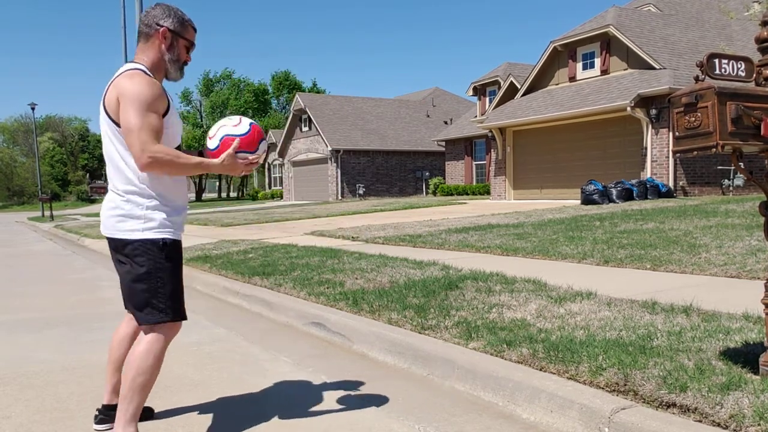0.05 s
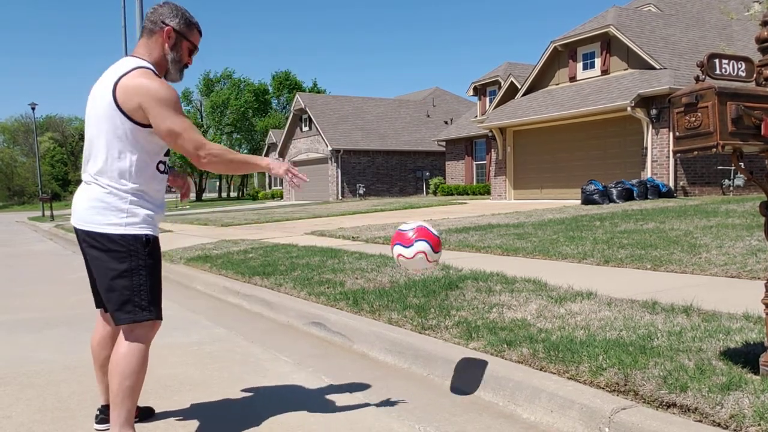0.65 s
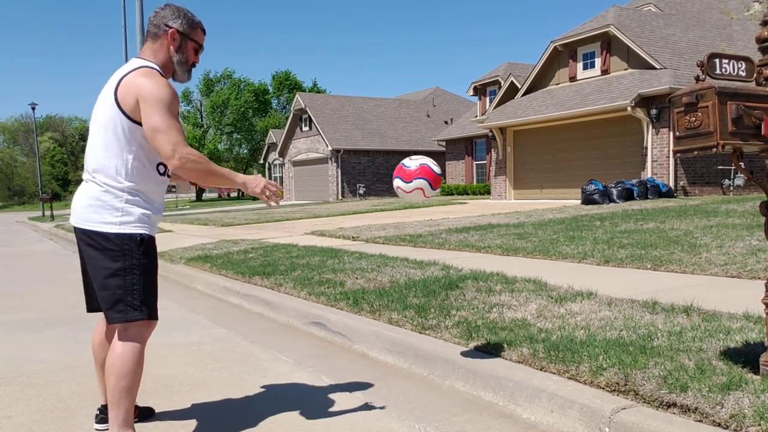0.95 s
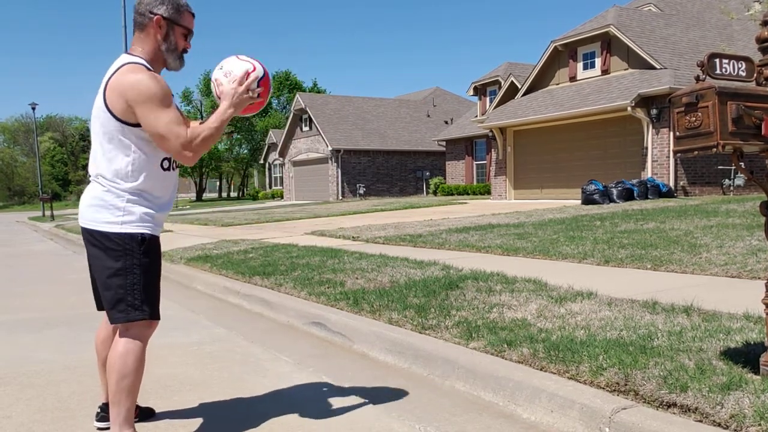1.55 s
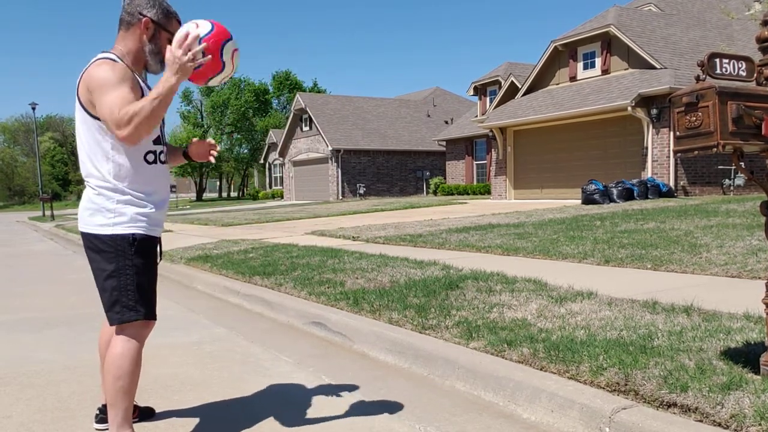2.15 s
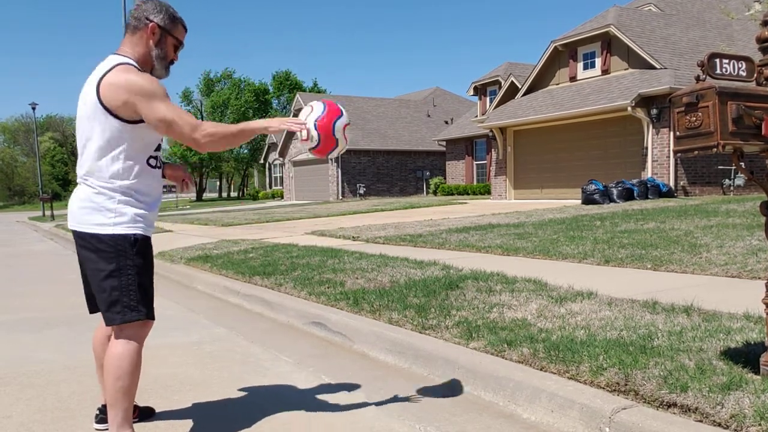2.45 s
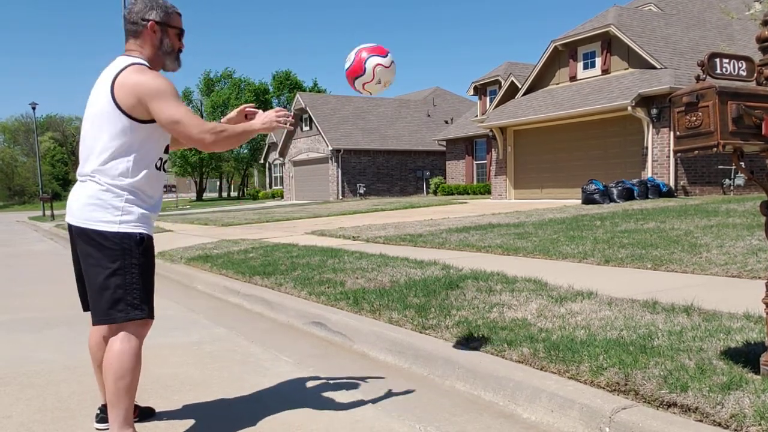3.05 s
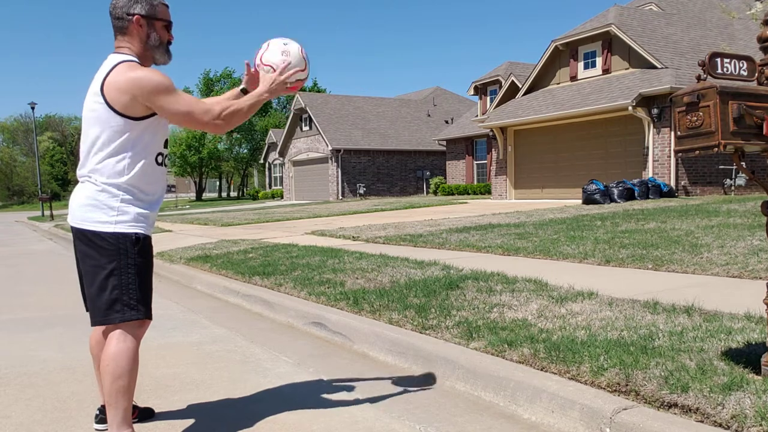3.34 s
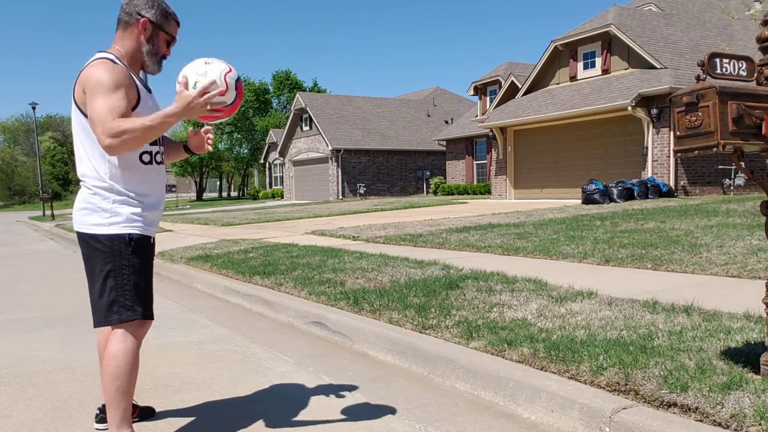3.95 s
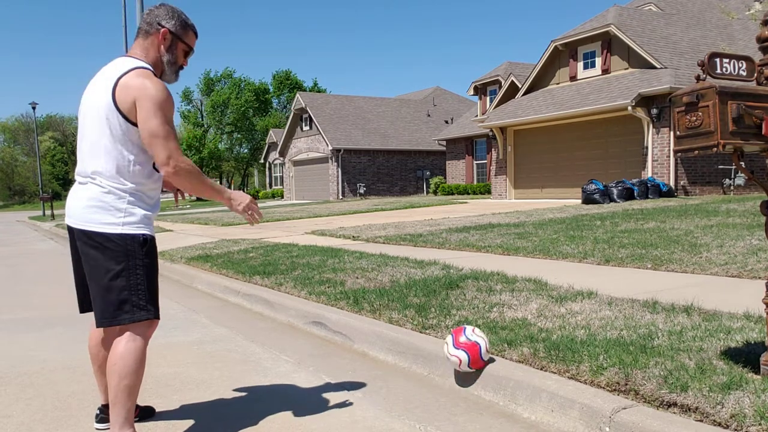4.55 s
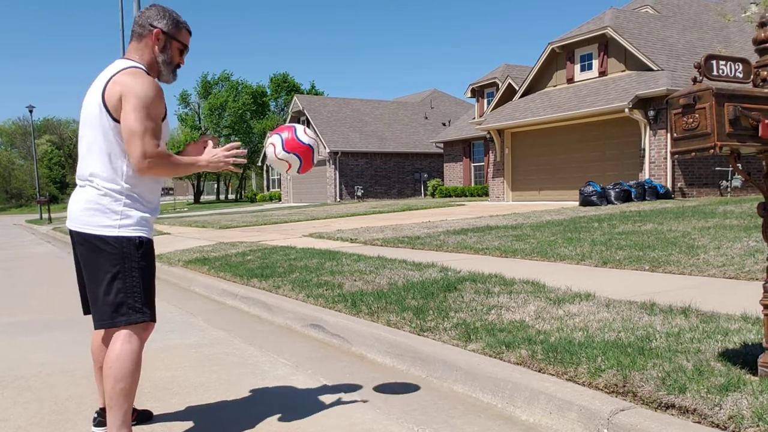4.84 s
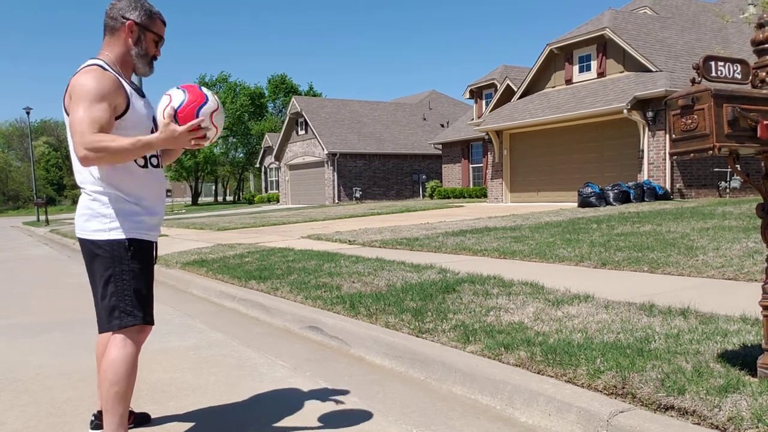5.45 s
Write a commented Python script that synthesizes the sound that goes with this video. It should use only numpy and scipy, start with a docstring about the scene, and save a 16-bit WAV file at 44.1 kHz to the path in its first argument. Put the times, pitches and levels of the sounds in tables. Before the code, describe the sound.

A football hits a concrete curb three times, about two seconds apart. Each bounce is a gritty smack with a deep thump and a hollow pop, followed about half a second later by the much softer slap of hands catching it. The ball is close to the microphone, with a faint echo from nearby houses. Small birds chirp in the distance over a low rumble of far traffic.

```python
"""Football against a curb

A football is thrown three times against a concrete curb on a quiet street and caught again.
Each bounce is a gritty smack, a deep thump as the ball flattens and springs back, and a pop as it leaves.
Hands slap and slide on its cover; birds sing in the trees, and far traffic rumbles behind the houses."""
import sys
import numpy as np
from scipy import signal
from scipy.fft import rfft, irfft
from scipy.io import wavfile

SR = 44100
rng = np.random.default_rng(int(sys.argv[2]) if len(sys.argv) > 2 else 0)


def wrap_up_sound(samples):
    """Save the sound to the file named by the first command line argument, as 16-bit audio."""
    columns = np.atleast_2d(samples).T
    # keep every value between -1 and 1, then stretch to whole-number steps
    tamed = np.clip(columns, -1, 1)
    steps = np.round(tamed * 32767).astype(np.int16)
    wavfile.write(sys.argv[1], SR, steps)


N = 251811
TIME = np.arange(N) / SR
BIN_HZ = np.arange(N // 2 + 1) * SR / N
SIDES = np.array([[1], [-1]])   # left, right


# Curb hits: (time [s], contact [s], thump [dB], landing knock [dB], crack [dB], crack pitch [Hz],
# grit smack [dB], scuff [dB], leaving pop [dB])
BOUNCES = [(0.8083, 0.016, -16.5, -25.5, -22.5, 4040, -21.5, -31, -16),
           (2.7190, 0.016, -16, -32.5, -29, 6050, -21.5, -39, -18),
           (4.6069, .0168, -15, -18, -16, 5390, -20, -33, -18.5)]
# Colour of grit crushed on concrete: (frequency [Hz], level [dB])
GRIT_COLOUR = [(300, 5.5), (1300, -0.5), (2300, -16.5), (3300, -10.5), (4400, -3), (5600, -2), (6800, -9.5),
               (8300, -24.5), (11000, -24.5), (15500, -17.5)]

def bounces(smack_t60=0.015, crack_t60=0.0067, crush_db=-23, crush_t60=0.037,
            scuff_s=0.0043, scuff_lead_s=0.0032, snap_db=-22, snap_t60=0.023):
    """The ball cracks down on grit, scuffs as it peels off, then pops back into shape."""
    lead_s, yield_s = .004, .0008   # pre-roll; time until the shell gives
    out, t = np.zeros(N), np.arange(SR // 4) / SR - lead_s
    for s, contact_s, thump_db, land_db, crack_db, crack_hz, smack_db, scuff_db, pop_db in BOUNCES:
        leaving = t - contact_s
        crack = from_db(crack_db) * ring(t, crack_hz, crack_t60)   # the taut cover slaps the concrete
        crush = from_db(crush_db) * fade(t, crush_t60)
        smack = from_db(smack_db) * (fade(-t, 0.0036) + fade(t, smack_t60) + crush)
        scuff = from_db(scuff_db) * np.exp(-((leaving + scuff_lead_s) / scuff_s) ** 2)
        grit = (smack + scuff) * noise(GRIT_COLOUR, len(t))
        snap = from_db(pop_db + snap_db) * fade(leaving, snap_t60) * noise(SLAP_COLOUR, len(t))
        shell = from_db(pop_db) * knock(leaving) - from_db(land_db) * knock(t + yield_s)
        low_end = from_db(thump_db) * thump(t - yield_s, contact_s)
        add(out, s - lead_s, low_end + crack + grit + snap + shell)
    return out


def thump(t, contact_s, skew=1.064, shell_db=-7, soft_hz=520, low_cut_hz=58, low_cut_q=1.47):
    """The ball flattens and springs back, radiating its volume's acceleration, and its shell wobbles."""
    dent = np.sin(np.pi * np.clip(t / contact_s, 0, 1) ** skew) ** 2
    acceleration = np.gradient(np.gradient(dent)) * (SR * contact_s / np.pi) ** 2 / 2
    wobble = ring(t + 0.0012, hz=130, t60=0.059)
    shell = from_db(shell_db) * ring(t - .0008, hz=204, t60=0.055)
    pressure = low_pass(acceleration, soft_hz) - wobble + shell
    w = 2 * np.pi * low_cut_hz   # the slowest part of the push is lost, leaving an overswing
    return signal.lfilter(*signal.bilinear([1, 0, 0], [1, w / low_cut_q, w * w], SR), pressure)


# The ball's ringing modes: (frequency [Hz], level [dB], decay t60 [s])
BALL_MODES = [(358, -26.5, 0.074), (503, -25.5, 0.0068), (876, -1.5, 0.0048), (1015, -10, 0.021),
              (1282, -14, 0.029), (1554, -20, 0.019), (1870, -32, 0.068)]

def knock(t, spread_db=2.5):
    """All modes of the ball ring, each a little stronger or weaker from blow to blow."""
    return sum(from_db(db + spread_db * rng.standard_normal()) * ring(t, hz, t60)
               for hz, db, t60 in BALL_MODES)


# Hands catching the ball: (time [s], palm delay [s], finger slap [dB], finger knock [dB],
# palm slap [dB], palm air pocket [dB], pocket pitch [Hz])
CATCHES = [(1.4399, .0102, -51, -47, -41.5, -36, 359), (3.4286, .0075, -48, -42, -47, -43, 434),
           (5.013, .0150, -46, -46, -39, -43.5, 424)]

def catches(fingers=3, uneven=0.15, spread_db=1.5, fingertip_hz=466, pitch_spread=0.081, lead_s=0.0054):
    """The fingers land one after another, then the cupped palm closes on the ball."""
    out, t = np.zeros(N), np.arange(SR // 8) / SR - lead_s
    for s, grip_s, finger_db, knock_db, palm_db, pocket_db, pocket_hz in CATCHES:
        for k, (late, force, size) in enumerate(rng.standard_normal((fingers, 3))):
            finger = touch(t, finger_db, knock_db, fingertip_hz * np.exp(pitch_spread * size))
            delay_s = grip_s * k / fingers * (1 + uneven * late)
            add(out, s - lead_s + delay_s, from_db(spread_db * force) * finger)
        palm = touch(t, palm_db, pocket_db, pocket_hz, seal_s=0.00394)
        add(out, s - lead_s + grip_s, palm)
    return out


# Colour of a slap or snap on the cover: (frequency [Hz], level [dB])
SLAP_COLOUR = [(300, -4), (1300, -7), (2300, 2), (4500, 7.5), (6000, -1), (7500, -23.5), (10000, -20),
               (15500, -20)]

def touch(t, slap_db, knock_db, pocket_hz, seal_s=0, slap_t60=0.017, press_s=0.0016,
          hollow_db=-5, shell_db=-3):
    """A finger or palm slaps the cover, seals a ringing pocket of air and knocks the shell."""
    slap = from_db(slap_db) * (fade(-t, press_s) + fade(t, slap_t60)) * noise(SLAP_COLOUR, len(t))
    sealed = t - seal_s
    pocket = ring(sealed, pocket_hz, t60=0.065)
    hollow_overtone = from_db(hollow_db) * ring(sealed, 2.32 * pocket_hz, t60=0.034)
    shell = from_db(shell_db) * knock(sealed)
    return slap + from_db(knock_db) * (pocket + hollow_overtone + shell)


WIPE_AT_S, WIPE_LENGTH_S = .030, .038   # a hand slides over the cover before the first throw

def wipe_taps(pocket_hz=2050, ease_s=0.011, lead_s=0.0057):
    """The sliding hand taps the cover as it lands, as it presses hardest and as it flicks off."""
    out, t = np.zeros(N), np.arange(SR // 8) / SR - lead_s
    land, press, flick = (0, -51, -47), (WIPE_LENGTH_S, -46, -53), (WIPE_LENGTH_S + ease_s, -47, -62)
    for after_s, slap_db, knock_db in (land, press, flick):
        add(out, WIPE_AT_S + after_s - lead_s, touch(t, slap_db, knock_db, pocket_hz))
    return out


# Colour of skin rubbing the cover: (frequency [Hz], level [dB])
RUB_COLOUR = [(300, 3.5), (600, 1), (1500, 4), (3200, -16), (5500, 4), (7500, -6), (10000, -13.5),
              (15500, 1)]

def rubs(wipe_db=-48, grip_db=-58, grain_db=3, grain_hz=360):
    """Skin sticks and slips on the cover in fine uneven grains, in the wipe and in every catch."""
    pressure = from_db(wipe_db) * stroke(WIPE_AT_S, WIPE_LENGTH_S, swell_db=7, release_t60=0.043)
    for s, grip_s, *_ in CATCHES:
        pressure += from_db(grip_db) * stroke(s, grip_s, swell_db=2, release_t60=.13)
    grain = rms_one(low_pass(rng.standard_normal(N), grain_hz))
    return pressure * from_db(grain_db * grain) * np.array([noise(RUB_COLOUR), noise(RUB_COLOUR)])


def stroke(s, length_s, swell_db, release_t60, attack_s=0.0066):
    """Pressure of a sliding hand: it comes on quickly, grows ever faster, then lets go."""
    t = TIME - s
    attack = fade(np.maximum(-t, 0), attack_s)
    swell = from_db(swell_db * np.clip(t / length_s, 0, 1) ** 2)
    release = fade(np.maximum(t - length_s, 0), release_t60)
    return attack * swell * release


# Cues for one bird's call: (time [s], relative level [dB])
SCOOP_CALLS = [(1.000, -63), (1.362, -58.5)]
# Its two syllables: (delay [s], length [s], first pitch [Hz], middle pitch [Hz], last pitch [Hz])
SCOOP_SYLLABLES = [(0, .075, 3310, 2990, 3000), (0.092, 0.088, 3065, 3230, 3940)]

def scooping_bird(buzz_depth_hz=190):
    """A nearer bird repeats a buzzy call that dips and scoops upward."""
    out = np.zeros(N)
    for s, db in SCOOP_CALLS:
        for delay_s, length_s, *pitches in SCOOP_SYLLABLES:
            add(out, s + delay_s, from_db(db) * chirp(length_s, pitches, buzz_depth_hz))
    return out


# Slurred whistles: (time [s], length [s], first pitch [Hz], last pitch [Hz], relative level [dB])
BIRD_NOTES = [(0.096, 0.037, 3620, 3310, -62), (0.452, .06, 4490, 4480, -73.5),
              (2.223, 0.044, 2540, 2710, -63), (2.325, 0.037, 3040, 2675, -62.5),
              (2.47, 0.13, 4180, 3340, -67), (2.734, 0.031, 2610, 2540, -61),
              (2.839, 0.065, 3074, 1985, -69), (3.037, .12, 3510, 3310, -63),
              (3.156, 0.068, 2940, 2375, -73.5), (3.621, 0.032, 2756, 2870, -67),
              (3.649, 0.03, 2976, 2545, -64.5), (3.777, 0.1, 4320, 3740, -75.5),
              (3.975, .05, 5200, 4400, -74), (4.104, 0.032, 3290, 3255, -64), (4.2, 0.13, 3640, 3470, -72),
              (4.207, .11, 2760, 1926, -67), (4.364, .09, 3078, 2926, -67), (4.464, .03, 2944, 2190, -70),
              (4.549, 0.061, 5270, 4200, -69), (4.624, 0.066, 2353, 1945, -60.5),
              (5.158, 0.15, 2902, 2850, -69), (5.164, 0.058, 4080, 3610, -68.5)]

def slurring_birds(sag=.012, warble=0.025):
    """Nearer birds slur single notes that warble and sag a little in the middle."""
    out = np.zeros(N)
    for s, length_s, first_hz, last_hz, db in BIRD_NOTES:
        middle_hz = np.sqrt(first_hz * last_hz) * (1 - sag)
        add(out, s, from_db(db) * chirp(length_s, [first_hz, middle_hz, last_hz], warble * middle_hz))
    return out


# Fader ride on the distant birds: (time [s], relative note level [dB])
CHORUS_LEVEL = [(0, -94.5), (3.3, -87), (4.2, -86), (4.8, -70.5), (5.3, -81.5), (5.7, -68)]

def chorus(low_hz=2400, high_hz=5100, glide=0.15, rasp_hz=110, shortest_s=0.0158, spread_s=.04,
           count=300):
    """Distant birds chatter at random in quick, mostly falling notes."""
    out = np.zeros(N)
    for when, length, height, slope, rasp in rng.random((count, 5)):
        s = when * N / SR
        middle_hz = low_hz * (high_hz / low_hz) ** height
        fall = glide * (1.2 * slope - .5)
        pitches = middle_hz * np.array([1 + fall, 1, 1 - fall])
        note = chirp(shortest_s + spread_s * length, pitches, rasp * rasp_hz)
        add(out, s, from_db(curve(CHORUS_LEVEL, s)) * note)
    return out


def far_whistler(pitch_hz=2620, spread=0.15, length_s=0.1106, droop=0.02, count=10):
    """One far bird pipes nearly level notes at loose intervals."""
    out = np.zeros(N)
    for k, (late, height) in enumerate(rng.random((count, 2))):
        middle_hz = pitch_hz * (1 + spread * (2 * height - 1))
        pitches = middle_hz * np.array([1 + droop, 1, 1 - droop])
        add(out, (k + late) * N / SR / count, chirp(length_s, pitches, buzz_depth_hz=0))
    return out


def chirp(length_s, pitches, buzz_depth_hz, buzz_hz=150, waver=0.0067, flutter_db=3):
    """A whistle glides through three pitches, with a fast warble that makes it buzz."""
    progress = np.linspace(0, 1, int(length_s * SR))
    jitter = rms_one(low_pass(rng.standard_normal((2, SR // 4)), hz=79))
    tremble, flutter = jitter[:, -len(progress):]
    glide_hz = np.polyval(np.polyfit([0, .5, 1], pitches, 2), progress)
    buzz = np.sin(2 * np.pi * buzz_hz * length_s * progress)
    hz = glide_hz * (1 + waver * tremble) + buzz_depth_hz * buzz
    swell = np.sqrt(2 * np.abs(np.sin(np.pi * progress))) * from_db(flutter_db * flutter)
    return swell * np.sin(2 * np.pi * np.cumsum(hz) / SR)


# Slapback from house fronts: (delay [s], level [dB])
ECHOES = [(0.042, -33.5), (.128, -43.5)]

def house_echoes(x):
    """Walls throw back distinct, faint copies of the sound."""
    return sum(from_db(db) * np.interp(TIME - delay_s, TIME, x, left=0) for delay_s, db in ECHOES)


# Colour of the street's reverb: (frequency [Hz], level [dB])
TAIL_COLOUR = [(60, -5), (200, 3.5), (500, 5), (1100, -4.5), (2300, 5.5), (5000, -10.5), (8000, 0),
               (11000, 6.5), (15500, 0.5)]

def street_reverb(x, t60, build_s):
    """Houses, lawns and trees return a thin diffuse tail, different on each side."""
    t = np.arange(SR) / SR
    envelope = fade(t, t60) * (1 - np.exp(-t / build_s))
    tail = envelope * np.array([noise(TAIL_COLOUR, SR), noise(TAIL_COLOUR, SR)])
    return signal.fftconvolve(x[None], rms_one(tail) / np.sqrt(SR), axes=1)[:, :N]


# Fader ride on the far traffic: (time [s], level before trim [dB])
TRAFFIC_LEVEL = [(0.0, -51), (0.79, -54.5), (0.97, -49.5), (3.54, -50), (5.7, -48.5)]
# Colour of its rumble: (frequency [Hz], level [dB])
RUMBLE_COLOUR = [(15, -53), (28, -21), (50, -1.5), (76, 0), (122, -2), (160, -12), (220, -17), (300, -24),
                 (450, -35), (700, -65.5), (1500, -69), (4000, -75.5)]

def traffic_rumble(trim_db=3, gust_db=2.0, gust_hz=5):
    """Far traffic and breeze rumble unevenly."""
    gusts = rms_one(low_pass(rng.standard_normal(N + SR), gust_hz)[SR:])
    level_db = curve(TRAFFIC_LEVEL, TIME) + trim_db + gust_db * gusts
    return from_db(level_db) * wide_noise(RUMBLE_COLOUR, side_db=-17)


# Colour of distant tyres: (frequency [Hz], level [dB])
SWISH_COLOUR = [(150, -12.5), (400, 13), (750, 4), (1200, -12.5), (2200, -11), (4000, -44)]

def tyre_swish(peak_s=4.4, peak_db=-66, rise_db_per_s=16.5, fall_db_per_s=10, bed_db=-88):
    """A distant tyre swish builds up and dies away over a steady bed."""
    away_db = np.maximum(rise_db_per_s * (peak_s - TIME), fall_db_per_s * (TIME - peak_s))
    swell = np.hypot(from_db(peak_db - away_db), from_db(bed_db))
    return swell * wide_noise(SWISH_COLOUR, side_db=-4)


# Colour of the hiss bed: (frequency [Hz], level [dB])
HISS_COLOUR = [(500, 2), (1500, -10), (2000, -9), (2550, -7.5), (3100, -12.5), (4000, -5.5), (5000, -3),
               (6100, -9), (6800, -16.5), (7500, -24.5), (9500, -25.5), (12500, -15), (16000, -19)]
# Its pan by band: (frequency [Hz], left minus right [dB])
HISS_BALANCE = [(1300, 2.5), (2400, 7), (4400, 12.5), (6000, 23.5), (8100, -4), (11000, 2.5), (15000, 2)]

def hiss(level_db=-70.5):
    """A thin steady hiss, stronger on the left."""
    spectra = rfft([noise(HISS_COLOUR), noise(HISS_COLOUR)])
    pan = from_db(SIDES * at_hz(HISS_BALANCE, BIN_HZ) / 2)
    return from_db(level_db) * irfft(spectra * pan, N)


def arrive(x, right_lag_s):
    """The right microphone hears the sound later; in the treble the phase lag levels off at 1 radian."""
    phase = np.tanh(2 * np.pi * BIN_HZ * right_lag_s)
    return np.array([x, irfft(rfft(x) * np.exp(-1j * phase), N)])


def microphone_ports(x, port_hz=5200, width_hz=1900, ring_db=5.5, air_db=-9, lean_left_db=0.97):
    """The left port rings near 5 kHz and dips above it; the right dips there and lifts the very top."""
    left, right = x
    left = left + from_db(ring_db) * resonance(left, port_hz, width_hz)
    left = left - 0.79 * resonance(left, hz=9300, width_hz=3500)
    air = from_db(air_db) * resonance(right, hz=12000, width_hz=4000)
    right = right - 0.45 * resonance(right, port_hz, width_hz) + air
    return np.array([left, right]) * from_db(SIDES * lean_left_db)


def from_db(db):
    return 10 ** (np.asarray(db) / 20)


def rms_one(x):
    return x / np.sqrt(np.mean(x ** 2) + 1e-20)


def curve(points, s):
    """A fader ride read at time s."""
    return np.interp(s, *np.transpose(points))


def at_hz(points, hz):
    """A spectrum read on a log-frequency axis."""
    f, value = np.transpose(points)
    return np.interp(np.log(hz + 1), np.log(f), value)


def noise(colour, size=N):
    """Noise of the given colour, rms 1."""
    hz = np.arange(size // 2 + 1) * SR / size
    return rms_one(irfft(rfft(rng.standard_normal(size)) * from_db(at_hz(colour, hz)), size))


def wide_noise(colour, side_db):
    """Mid/side noise: the side level sets the width."""
    return noise(colour) + from_db(side_db) * SIDES * noise(colour)


def add(out, s, sound):
    """Mix a sound in from time s."""
    start = max(round(s * SR), 0)
    out[start:start + len(sound)] += sound[:max(N - start, 0)]


def low_pass(x, hz):
    return signal.sosfilt(signal.butter(2, hz, fs=SR, output="sos"), x)


def resonance(x, hz, width_hz):
    """Band-pass with gain 1 at its peak."""
    return signal.lfilter(*signal.iirpeak(hz, hz / width_hz, fs=SR), x)


def fade(t, t60):
    """Exponential decay from t = 0, silent before."""
    return (t >= 0) * np.exp(-np.log(1000) * np.maximum(t, 0) / t60)


def ring(t, hz, t60):
    """One mode struck at t = 0."""
    return np.sin(2 * np.pi * hz * t) * fade(t, t60)


def scene():
    """The ball close by, the birds far off, the street around them."""
    ball = bounces() + catches() + wipe_taps()
    rubbing = rubs()
    song = scooping_bird() + slurring_birds()
    chatter = chorus() + from_db(-84) * far_whistler()
    near = arrive(ball, right_lag_s=.00007) + rubbing * from_db(-1.5 * SIDES) + house_echoes(ball)
    near_tail = from_db(-19) * street_reverb(ball + rubbing[0], t60=0.67, build_s=0.0047)
    birds = from_db(-0.5) * song + from_db(-1) * chatter
    bird_send = from_db(-2.5) * song + from_db(-0.1) * chatter
    bird_tail = street_reverb(bird_send, t60=0.57, build_s=.005)
    traffic = (traffic_rumble() + tyre_swish()) * from_db(1.02 * SIDES)
    return microphone_ports(near + near_tail + birds + bird_tail) + traffic + hiss()


def record(dry, low_cut_hz=22, high_cut_hz=16000):
    """The deepest bass is lost and the top is cut steeply."""
    thinned = signal.sosfilt(signal.butter(1, low_cut_hz, "high", fs=SR, output="sos"), dry)
    return signal.sosfilt(signal.ellip(10, .1, 80, high_cut_hz, fs=SR, output="sos"), thinned)


dry = scene()
out = record(dry)
wrap_up_sound(out)
```